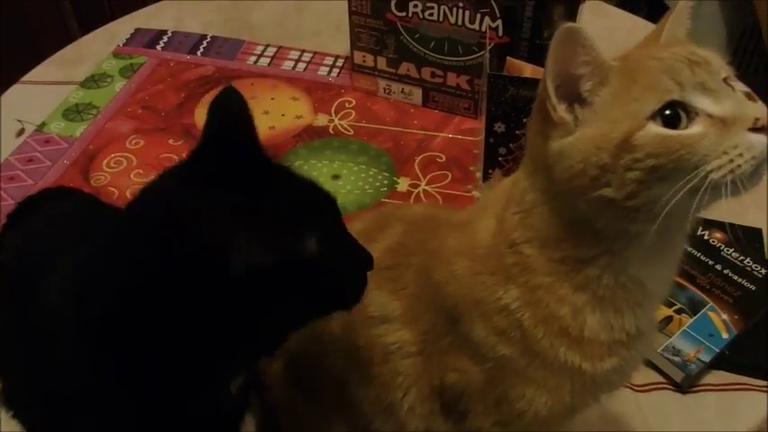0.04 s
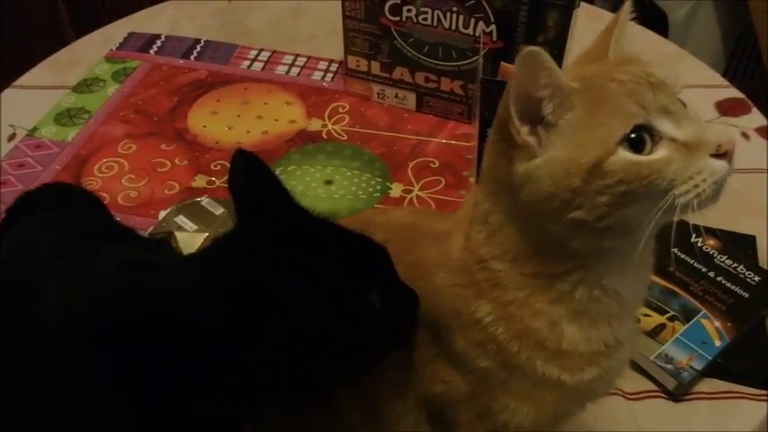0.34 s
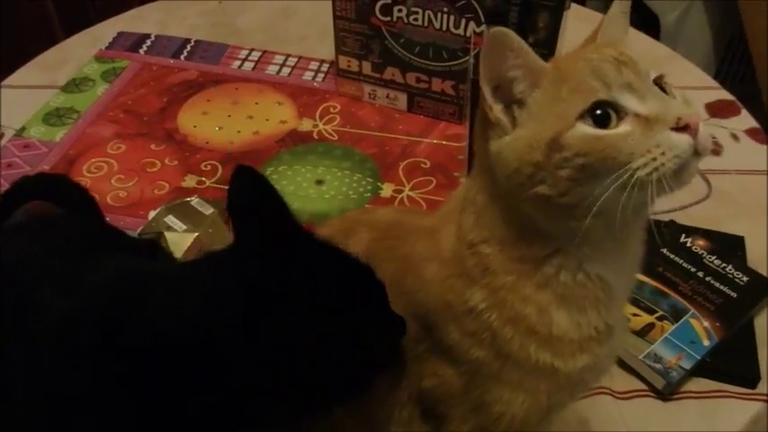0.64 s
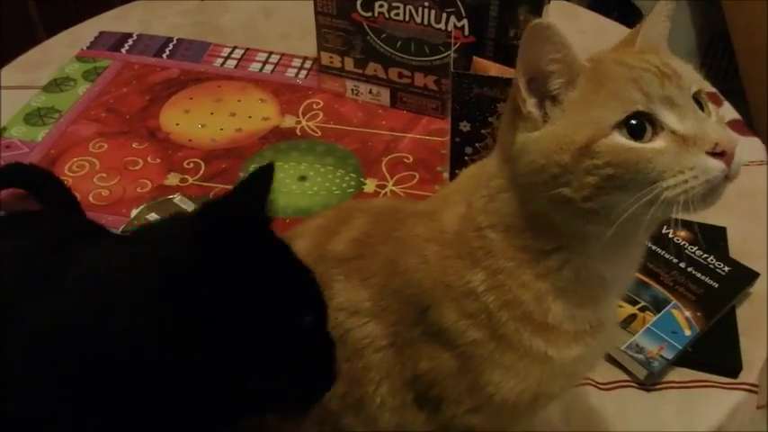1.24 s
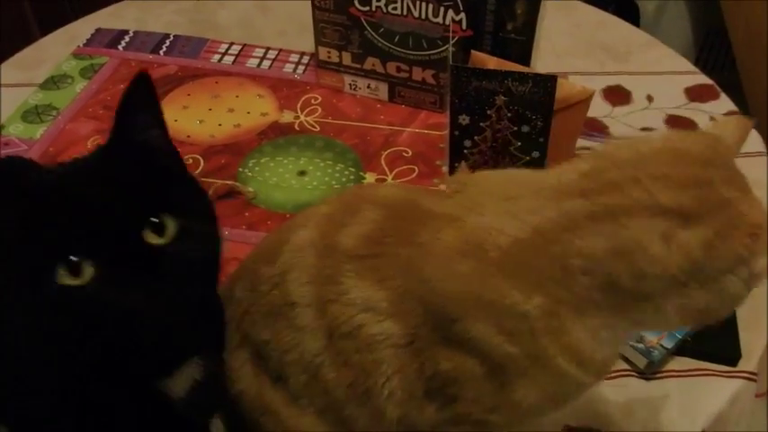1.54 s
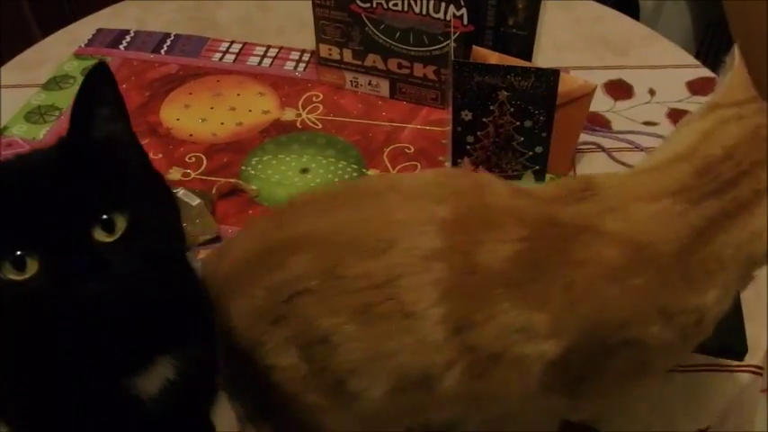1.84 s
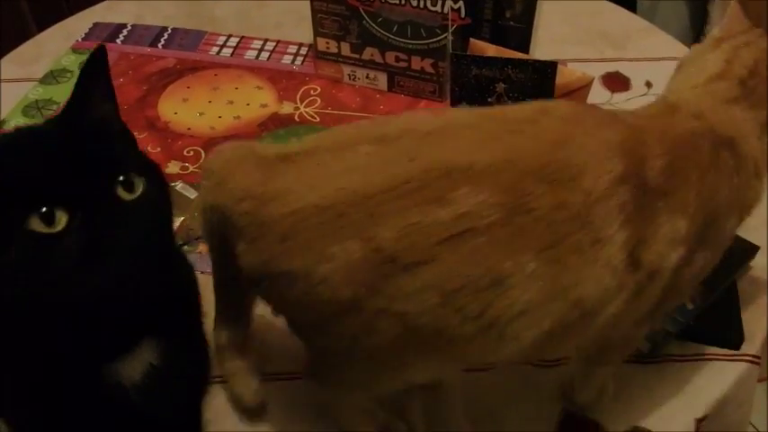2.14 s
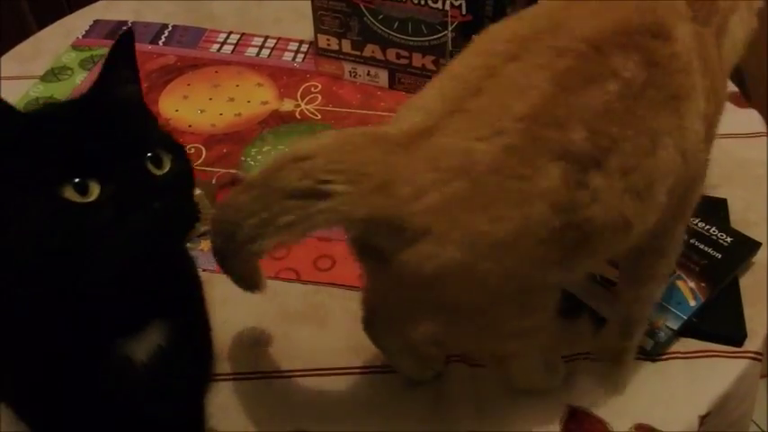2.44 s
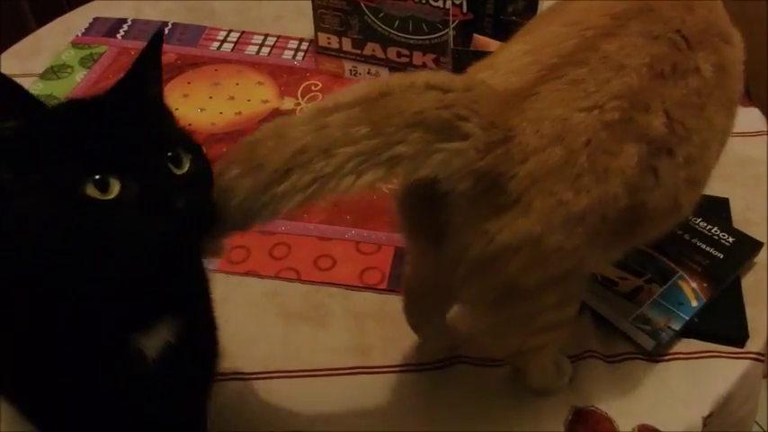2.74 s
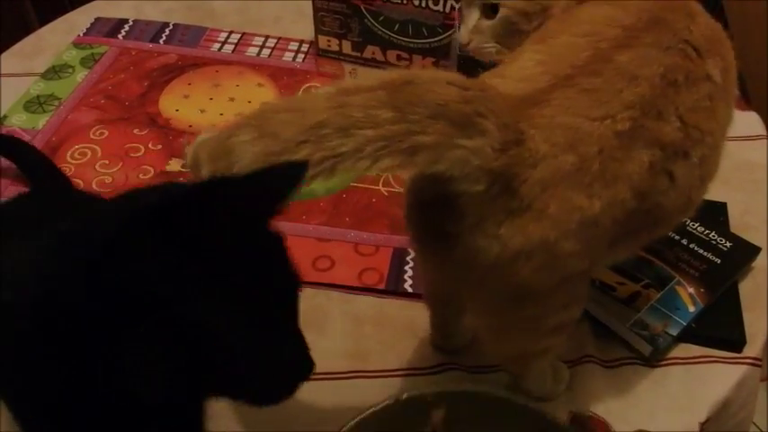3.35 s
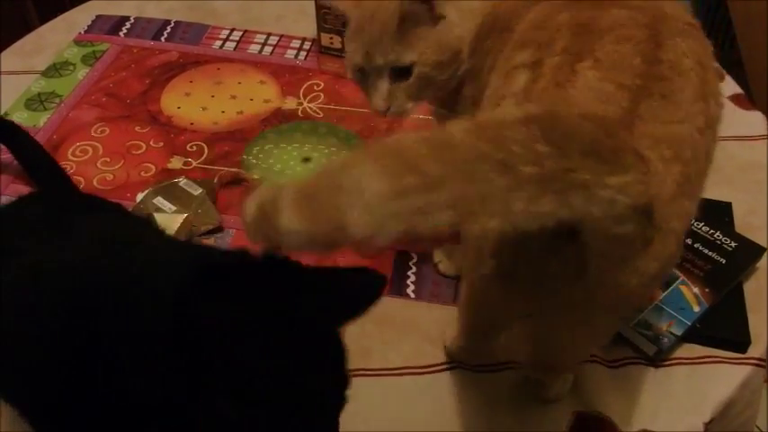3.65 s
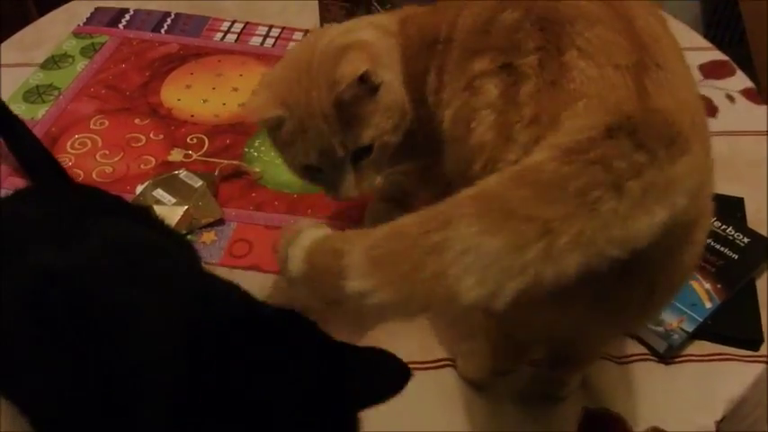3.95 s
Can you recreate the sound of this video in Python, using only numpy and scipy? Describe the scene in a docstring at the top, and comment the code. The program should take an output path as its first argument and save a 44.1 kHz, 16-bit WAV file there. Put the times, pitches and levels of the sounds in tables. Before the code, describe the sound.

Dry pet food rattles in a small tub close to the microphone from the start, about five shakes a second, with hollow drumming, ticking pellets and some sharp hits. The shaking eases after 2.3 seconds and stops near 2.7. Between about 3.3 and 3.7 seconds, a cat's faint fur rustle and three soft paw steps on a table barely rise above the quiet room's background hiss.

```python
"""Dry pet food shaken in a small tub, about five shakes a second, close to a microphone pair.
At each turn the heap of pellets lands on a wall: the tub drums, the pellets tick, and a few hit hard.
The shaking stops and a cat pads softly on a table, just above the tone of the quiet room.
The recorder passes the treble slightly late."""
import sys
import numpy as np
from scipy import signal
from scipy.fft import rfft, irfft
from scipy.io import wavfile
from scipy.ndimage import uniform_filter1d

SR = 44100
rng = np.random.default_rng(int(sys.argv[2]) if len(sys.argv) > 2 else 0)


def wav_out(sig):
    """Save sig, one row per channel (or a flat mono array), as 16-bit PCM at SR to the path in sys.argv[1]."""
    wavfile.write(sys.argv[1], SR, np.round(np.clip(np.atleast_2d(sig).T, -1, 1) * 32767).astype(np.int16))


N = 176400
TIME_S = np.arange(N) / SR
FREQ_HZ = np.arange(N // 2 + 1) * SR / N

# Landings of the heap, levels relative: start_s, length_s, drumming_db, ticking_db
LANDINGS = [(0, .02, -25, -26), (0.025, 0.034, -21, -23), (0.133, 0.029, -30.5, -34),
            (0.176, 0.026, -31, -48), (0.217, 0.03, -26, -31.5), (0.322, .005, -35.5, -63),
            (0.347, 0.017, -19.5, -22.5), (.385, 0.032, -24.5, -35.5), (0.413, .012, -22, -26),
            (0.43, 0.039, -34, -39), (0.517, 0.044, -21, -29), (0.58, 0.034, -19, -24),
            (0.671, 0.047, -36.5, -32.5), (0.699, 0.026, -21.5, -27), (0.74, 0.036, -29, -32),
            (0.789, 0.016, -24, -23.5), (.88, .035, -26, -34), (0.952, 0.032, -23.5, -25.5),
            (0.988, 0.0083, -16.5, -27.5), (1.064, 0.043, -22, -26.5), (1.127, 0.012, -19, -28.5),
            (1.147, 0.018, -14, -20.5), (1.253, 0.034, -22, -23.5), (1.305, 0.047, -24.5, -30.5),
            (1.357, 0.014, -14, -22.5), (1.442, 0.065, -25, -28), (1.52, 0.029, -19, -24.5),
            (1.566, 0.015, -14.5, -20.5), (1.645, .064, -25, -30), (1.722, 0.041, -18.5, -21.5),
            (1.838, 0.047, -26.5, -35), (1.897, 0.037, -24.5, -28), (1.929, 0.03, -21, -30.5),
            (2.017, 0.046, -25, -35.5), (2.069, 0.084, -25.5, -30), (2.11, 0.033, -19.5, -25),
            (2.199, 0.048, -26, -34.5), (2.268, 0.06, -21.5, -27), (2.405, 0.064, -33, -42.5),
            (2.467, 0.019, -28.5, -35.5), (2.58, 0.034, -27.5, -36), (2.63, 0.041, -30, -35),
            (2.664, 0.011, -25, -32)]


def undb(db):
    return 10 ** (np.asarray(db) / 20)


def unit(x):
    """Scale to rms 1."""
    return x / np.sqrt(np.mean(x ** 2) + 1e-20)


def seconds(length):
    return np.arange(int(length * SR)) / SR


def add(out, start_s, sound):
    i = max(int(start_s * SR), 0)
    out[i:i + len(sound)] += sound[:N - i]


def ring(x, response):
    """Pass x through an impulse response."""
    return signal.fftconvolve(x, response)[:N]


def gains(points):
    """Gain at every frequency from (Hz, dB) points."""
    hz, db = np.array(points, float).T
    return undb(np.interp(np.log(FREQ_HZ + 1), np.log(hz), db))


def colour(x, points):
    """Minimum-phase filter through (Hz, dB) points."""
    cepstrum = irfft(np.log(gains(points)))
    fold = 1 + np.sign(N // 2 - np.arange(N)) - (np.arange(N) == 0)
    response = irfft(np.exp(rfft(cepstrum * fold)))
    return ring(x, response[:N // 20])


def impacts(per_s, scatter_db):
    """Irregular impacts of uneven size, rms 1."""
    struck = rng.random(N) < per_s / SR
    return unit(struck * undb(scatter_db * np.clip(rng.standard_normal(N), -2, 2)))


def room_tone():
    """Steady room tone and microphone hiss in stereo, with two faint narrow whines."""
    # Spectra of the mid and side noise: freq_hz, gain_db
    mid_colour = [(15, -43), (25, -26), (43, -4), (86, -4.5), (178, -4), (240, -7), (281, 0), (349, -2.5),
                  (389, -1.5), (433, -13.5), (482, -9), (582, -13.5), (666, -7.5), (895, -10), (1140, -4),
                  (1410, -14), (1530, -12.5), (1710, -19), (2230, -15.5), (2920, -18.5), (3260, -19),
                  (6550, -20.5), (8580, -34.5), (13200, -31), (15500, -60)]
    side_colour = [(15, -39), (25, -11), (96, -5.5), (204, -7), (227, -6), (389, -15), (598, -13.5),
                   (722, -16.5), (1800, -16.5), (2490, -6.5), (3340, -15), (4040, -13), (4870, -19),
                   (5880, -10), (7700, -27), (13500, -30), (15500, -58)]
    # Whines: pitch_hz, width_hz, level_db
    whine_bands = [(1206, 70, -57.5), (6480, 150, -69)]
    mid = undb(-47.5) * unit(colour(rng.standard_normal(N), mid_colour))
    side = undb(-53.5) * unit(colour(rng.standard_normal(N), side_colour))
    for pitch_hz, width_hz, level_db in whine_bands:
        band = np.exp(-((FREQ_HZ - pitch_hz) / width_hz) ** 2)
        mid += undb(level_db) * unit(irfft(rfft(rng.standard_normal(N)) * band))
    return np.array([mid + side, mid - side])


def reflections(x, t60_s):
    """Diffuse reflections: x through a decaying noise of unit energy."""
    t = seconds(0.5)
    response = rng.standard_normal(len(t)) * undb(-60 * t / t60_s) * (1 - np.exp(-t / 0.001))
    return ring(x, response / np.linalg.norm(response))


def fur_rustle(peak_s=3.32, width_s=0.12):
    """As the cat turns, its fur brushes lightly against something on the table."""
    # Spectrum of brushing fur: freq_hz, gain_db
    fur_colour = [(300, -8), (1200, -3), (2400, 0), (3500, -4), (6000, -11), (14000, -26)]
    brushing = unit(colour(impacts(per_s=2000, scatter_db=3), fur_colour))
    return undb(-53) * brushing * np.exp(-((TIME_S - peak_s) / width_s) ** 2)


def paw_steps(width_s=0.023):
    """Soft paws land on a tablecloth, each a dull puff of noise."""
    # Steps: peak_s, level_db
    steps = [(3.34, -49), (3.425, -47), (3.625, -42.5)]
    # Spectrum of a step: freq_hz, gain_db
    paw_colour = [(40, -8), (150, 4), (380, 0), (700, -27), (3000, -27), (12000, -44)]
    pressure = sum(undb(db) * np.exp(-((TIME_S - peak_s) / width_s) ** 2) for peak_s, db in steps)
    return unit(colour(rng.standard_normal(N), paw_colour)) * pressure


def heap_force(levels_db, swell_s=0.003, settle_s=0.006, rolling_db=-44.5):
    """Each landing swells, holds and settles; loose pellets roll faintly in between."""
    def hold(start_s, length_s):
        early = np.maximum(start_s - TIME_S, 0)
        late = np.maximum(TIME_S - (start_s + length_s), 0)
        return np.exp(-early / swell_s - late / settle_s)

    power = sum((undb(db) * hold(*row[:2])) ** 2 for row, db in zip(LANDINGS, levels_db))
    rolling = undb(rolling_db) * hold(0, LANDINGS[-1][0])
    return np.sqrt(power + rolling ** 2)


def tub_modes():
    """The tub's damped resonances, one a row; together they have unit energy."""
    # Modes of the tub: pitch_hz, t60_s, relative_db
    resonances = [(151.7, 0.047, -3.5), (193, 0.041, -3), (225, 0.023, -1.5), (267, 0.038, -1.5),
                  (324.4, 0.042, 3), (379, 0.033, -1.5), (456, 0.027, -3), (624, .015, -8.5),
                  (780, 0.027, -1.5), (840, 0.023, -3.5), (978, 0.012, -2), (1190, 0.014, -9.5)]
    t = seconds(0.15)
    modes = np.array([undb(db) * unit(np.sin(2 * np.pi * hz * t) * undb(-60 * t / t60_s))
                      for hz, t60_s, db in resonances])
    return modes / np.sqrt(np.sum(modes ** 2))


def tub_radiation(x, cutoff_hz=146, bass_db=-14):
    """Below its lowest mode the small tub radiates little sound."""
    upper = signal.sosfilt(signal.butter(6, cutoff_hz, "high", fs=SR, output="sos"), x)
    bass = signal.sosfilt(signal.butter(2, cutoff_hz, fs=SR, output="sos"), x)
    return upper + undb(bass_db) * bass


def tub_drumming(force):
    """Pellets strike the tub; each place of impact drives the modes with different signs."""
    strikes = impacts(per_s=1000, scatter_db=3) * force
    return undb(-4) * sum(ring(strikes * rng.choice([-1, 1], N), mode) for mode in tub_modes())


def pellet_ticks(collisions, shapes=24, decay_s=0.00055):
    """Pellets of many shapes click together, each shape with its own very short ring."""
    # Spectrum of the ticks: freq_hz, gain_db
    tick_colour = [(80, -21), (300, -21.5), (900, 6), (1350, -3.5), (1700, -7.5), (2150, 4), (2600, -1.5),
                   (2950, 6.5), (3300, -0.5), (3800, 1), (5000, -5.5), (7000, -12), (8700, -22),
                   (11500, -22.5), (13300, -28.5), (15500, -77)]
    t, ticks = seconds(0.005), np.zeros(N)
    shape = rng.integers(0, shapes, N)
    for k in range(shapes):
        click = rng.standard_normal(len(t)) * np.exp(-t / decay_s)
        ticks += ring(collisions * (shape == k), click / np.linalg.norm(click))
    return undb(-2) * colour(ticks, tick_colour) / np.sqrt(np.mean(gains(tick_colour) ** 2))


def hard_hits(thump_hz=607, thump_decay_s=0.00068, crack_rise_s=0.00054, crack_decay_s=0.00066):
    """A hard hit dents the wall with a thump, rings the tub and cracks brightly."""
    # Single hits, levels relative: start_s, thump_db, crack_db, crack_pitch_hz
    hits = [(.0152, -16, -12, 2240), (.0468, -28, -10, 3800), (.2195, -17, -29.5, 2350),
            (.3045, -22, -44, 2200), (.3335, -15, -19.5, 2400), (.352, -11, -10, 4800),
            (0.3579, -16, -8, 2420), (.4168, -2, -5, 4000), (.5235, -7, -29, 2430),
            (.5848, -5.5, -17, 2560), (.6712, -21, -30, 2300), (.7032, -5.5, -13, 2140),
            (0.7276, -31, -3, 2460), (.8028, -3, -6, 2310), (.8808, -8, -33, 2300), (0.9891, -13, -3, 2980),
            (1.152, -4.5, -13, 2620), (1.169, -7, -1, 2790), (1.242, -9, -4.5, 3240),
            (1.3086, -39, -18.5, 4200), (1.3625, -9, -7, 3600), (1.4913, -39, -15, 2620),
            (1.5557, -20, -15, 3540), (1.5691, -3, -4, 2310), (1.583, -9, -14.5, 3560),
            (1.6505, -20, -19.5, 2330), (1.7248, -7, -30, 2530), (1.7428, -35, -11, 3100),
            (1.8262, -22, -12.5, 1960), (1.904, -10.5, -8.5, 2860), (1.9198, -12, -12.5, 3700),
            (1.939, -13, -9, 3780), (2.1233, -10, -11.5, 3440), (2.139, -13, -11, 2700),
            (2.2035, -18, -31, 2400), (2.3027, -5, -9.5, 2530), (2.6685, -11, -21, 2480)]
    # Spectrum of a crack: freq_hz, gain_db
    crack_colour = [(80, -16), (300, -19), (1000, 6.5), (1600, -7), (2200, -1.5), (4000, 1), (7000, -7),
                    (9000, -14.5), (12000, -5), (15500, -39)]
    thumps, cracks, modes = np.zeros(N), np.zeros(N), tub_modes()
    t = np.arange(modes.shape[1]) / SR
    dent = np.sin(2 * np.pi * thump_hz * t) * np.exp(-t / thump_decay_s)
    snap = (1 - np.exp(-(t / crack_rise_s) ** 2)) * np.exp(-t / crack_decay_s)
    snap /= snap.max()
    for start_s, thump_db, crack_db, pitch_hz in hits:
        wall = rng.uniform(-1, 1, len(modes)) @ modes
        thump = dent + undb(-12.5) * wall / np.abs(wall).max()
        add(thumps, start_s, undb(thump_db) * thump)
        grit = unit(uniform_filter1d(rng.standard_normal(len(t)), size=4))
        tone = np.sin(2 * np.pi * (pitch_hz * t + rng.random()))
        add(cracks, start_s, undb(crack_db) * snap * (tone + 0.69 * grit))
    return undb(-3.5) * thumps, undb(-1) * colour(cracks, crack_colour)


def scene():
    """Tub, cat and room at two close microphones; each click differs between them and leans right."""
    # Balance of the tub, left minus right: freq_hz, difference_db
    balance = [(200, -0.5), (2400, -0.5), (4400, -1.5), (8000, -7), (15000, -5)]
    # Part of the tub's sound that the microphones do not share: freq_hz, gain_db
    width = [(60, -20), (200, -30), (1200, -34), (2400, -22.5), (4400, -11), (8000, -4), (15000, 2.5)]
    _, _, drumming_db, ticking_db = zip(*LANDINGS)
    thumps, cracks = hard_hits()
    collisions = impacts(per_s=900, scatter_db=4) * heap_force(ticking_db)
    body = tub_radiation(tub_drumming(heap_force(drumming_db)) + thumps)
    clicks = pellet_ticks(collisions) + cracks
    room = undb(-13.5) * reflections(body, t60_s=0.26) + undb(-13) * reflections(clicks, t60_s=0.2)
    mid = body + clicks + room
    # The same impacts with fresh waveforms give the stereo width.
    side = reflections(body, t60_s=0.03) + pellet_ticks(collisions)
    _, side_cracks = hard_hits()
    side = colour(side + side_cracks, width)
    lean = np.sqrt(gains(balance))
    left = irfft(rfft(mid + side) * lean)
    right = irfft(rfft(mid - side) / lean)
    return np.array([left, right]) + paw_steps() + fur_rustle() + room_tone()


def record(dry):
    """The recorder splits the sound in two bands, delays the upper one, rounds peaks and cuts the top."""
    split_hz, split_width_hz, treble_lag_s = 2870, 266, 0.01545
    ceiling, top_hz = 0.79, 15300
    upper = (1 + np.tanh((FREQ_HZ - split_hz) / (2 * split_width_hz))) / 2
    delay = np.exp(-2j * np.pi * FREQ_HZ * treble_lag_s)
    response = (1 - upper + upper * delay) / np.hypot(upper, 1 - upper)
    rounded = ceiling * np.tanh(irfft(rfft(dry) * response) / ceiling)
    return signal.sosfilt(signal.ellip(10, 0.2, 80, top_hz, fs=SR, output="sos"), rounded)


dry = scene()
out = record(dry)
wav_out(out)
```